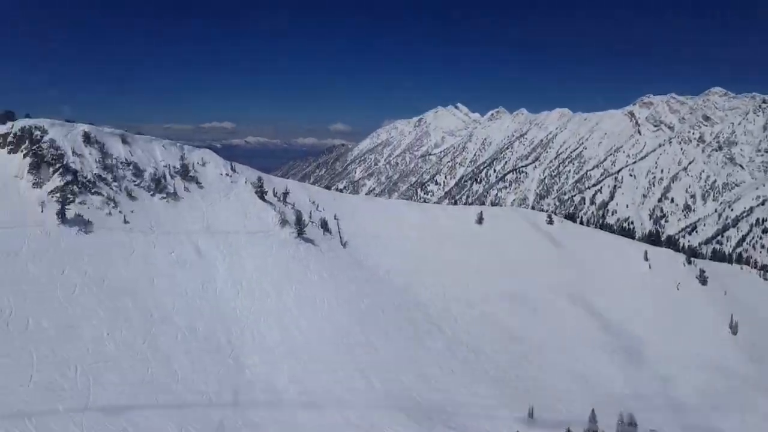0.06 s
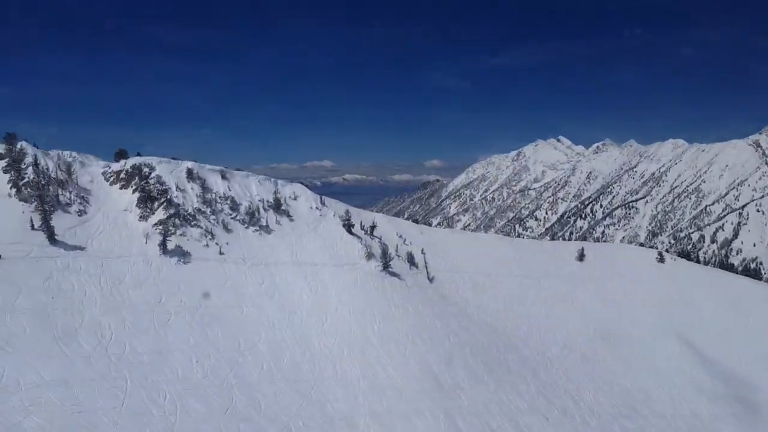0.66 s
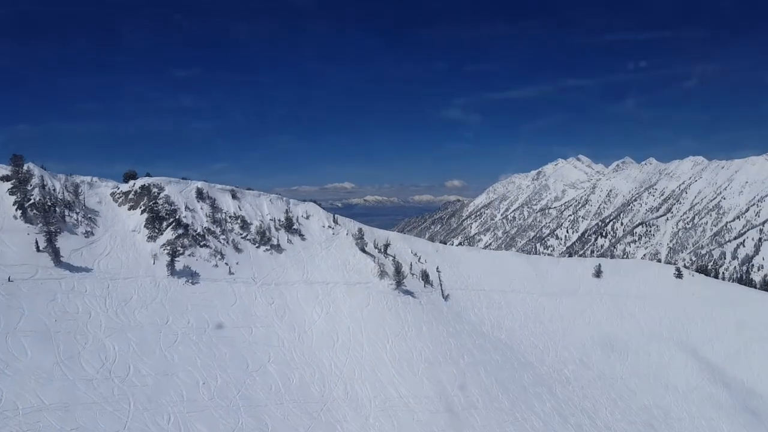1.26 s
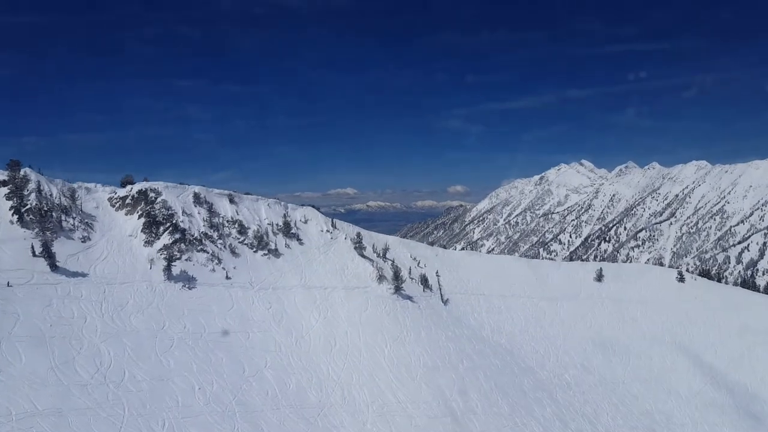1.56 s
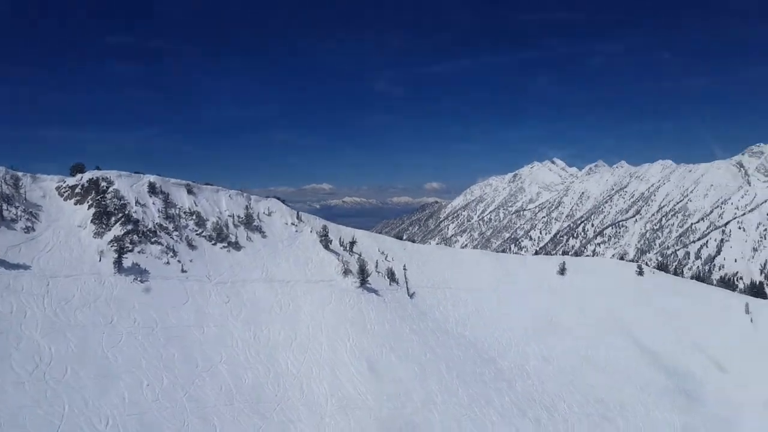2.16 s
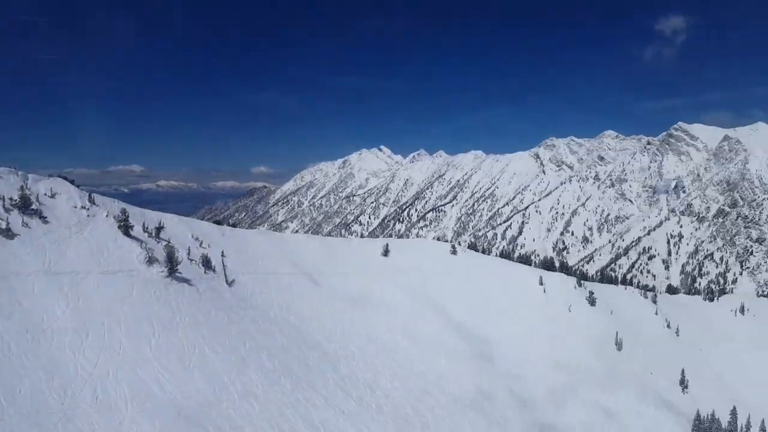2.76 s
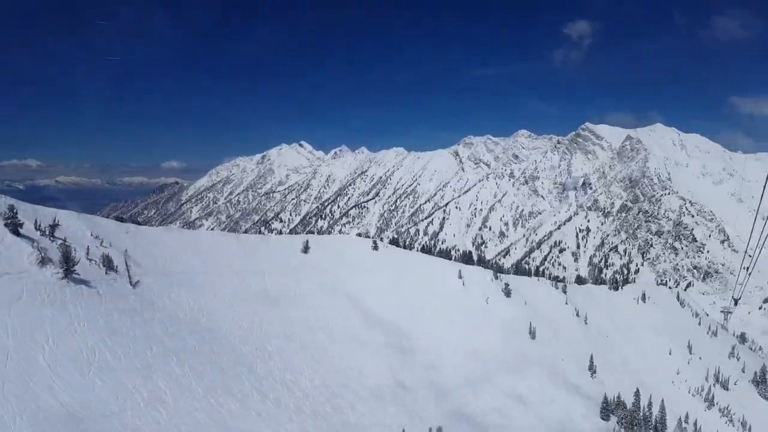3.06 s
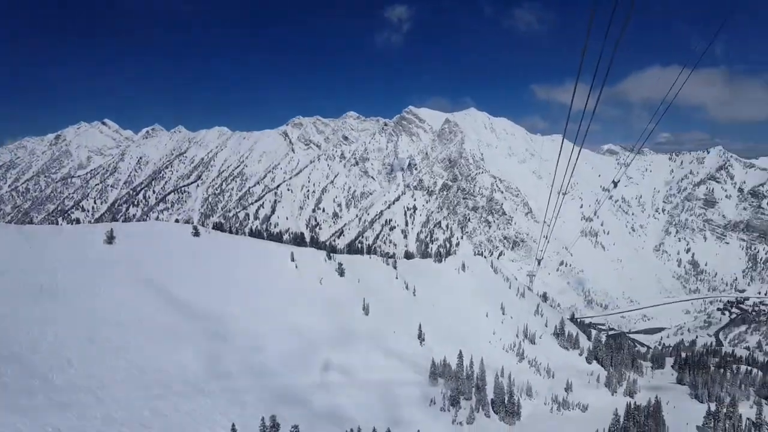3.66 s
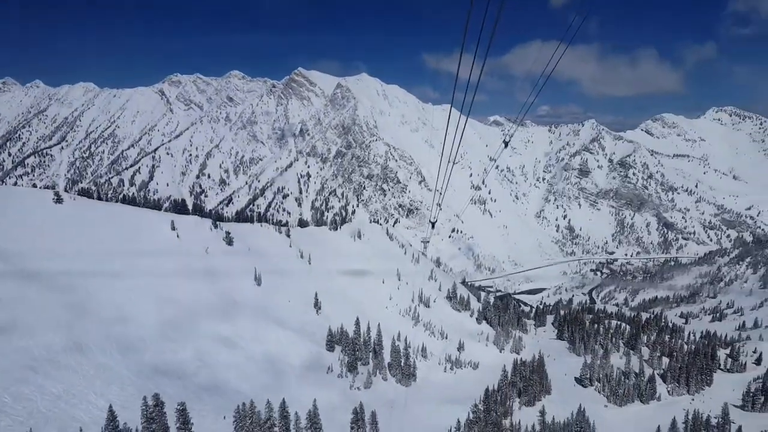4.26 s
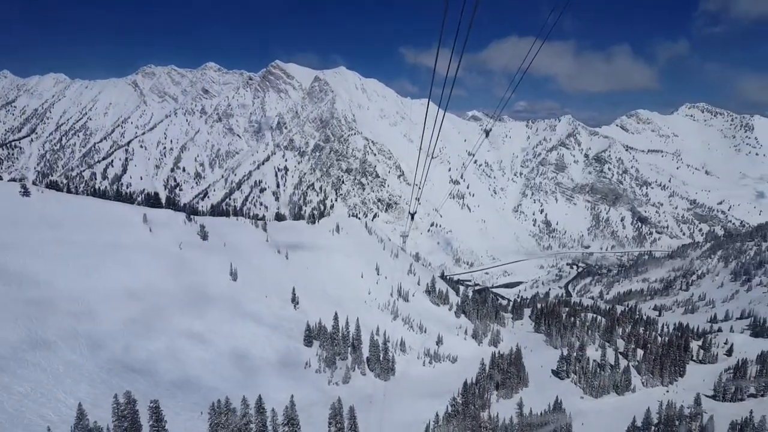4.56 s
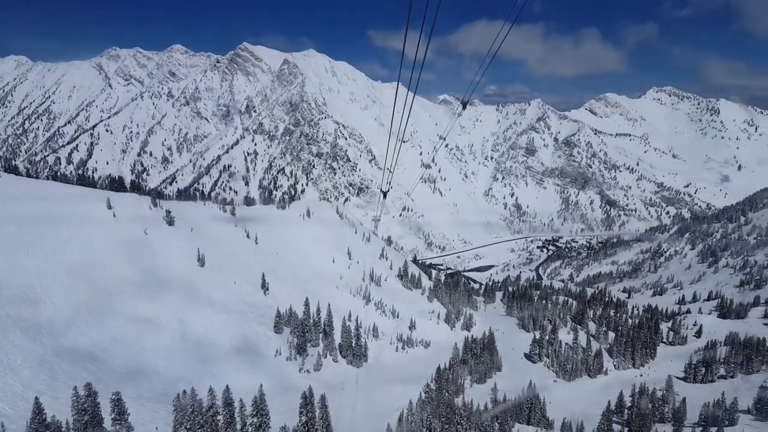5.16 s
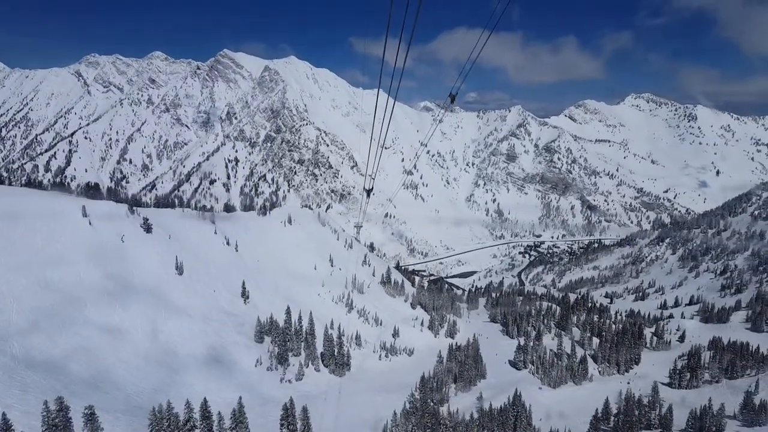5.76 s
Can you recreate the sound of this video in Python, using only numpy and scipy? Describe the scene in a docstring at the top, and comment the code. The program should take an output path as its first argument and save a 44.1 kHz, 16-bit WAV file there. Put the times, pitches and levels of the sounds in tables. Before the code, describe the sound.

Inside a cable car gliding along its cables, the wheels make a steady low rumble and a gently pulsing hum. A few soft shudders pass through the cabin, early on and again near the end. Close to the microphone, a nylon jacket rustles quietly, with faint ticks from creases and a zip pull, growing busier late on. A faint wash of air lies behind.

```python
"""Inside a gliding aerial tram

Carriage wheels rolling on the cable drone through the hanger and make the cabin rumble, with a soft
shudder at each rough spot. Close by, a nylon ski jacket rustles as its sleeve slides, creases tick and
a zip pull tinkles, all echoing briefly off the walls. Air rushes past the shell."""
import sys
import numpy as np
from scipy import signal
from scipy.fft import rfft, irfft, next_fast_len
from scipy.io import wavfile
from scipy.ndimage import uniform_filter1d

SR = 44100
rng = np.random.default_rng(int(sys.argv[2]) if len(sys.argv) > 2 else 0)


def digitize_waveform(pressure):
    """Quantize a signal to 16-bit integers and store it at the path in sys.argv[1].

    Rows of a 2-D input are taken as channels; values are limited to [-1, 1].
    """
    field = np.atleast_2d(pressure).T
    bounded = np.clip(field, -1, 1)
    quanta = np.round(bounded * 32767).astype(np.int16)
    wavfile.write(sys.argv[1], SR, quanta)


N = 260631
T = np.arange(N) / SR
MARGIN = 4096  # samples of padding at each end of a filtered signal
FREQS = np.fft.rfftfreq(2 * next_fast_len(N // 2 + MARGIN + 1), 1 / SR)
TOP_HZ = 15900


def undb(db):
    """Decibels to gain."""
    return 10 ** (np.asarray(db) / 20)


def unit(x):
    """Scale to rms 1."""
    return x / np.sqrt(np.mean(np.abs(x) ** 2))


def curves(table):
    """The columns of an automation table, sample by sample."""
    times, *columns = np.transpose(table)
    return [np.interp(T, times, column) for column in columns]


def response(points):
    """An EQ curve drawn through (freq_hz, level_db) points."""
    hz, db = np.transpose(points)
    return undb(np.interp(np.log(FREQS + 1), np.log(hz), db))


def lowpass(cutoff_hz, order):
    """An EQ curve that rolls off by 6 dB per octave for each order."""
    return 1 / (1 + (FREQS / cutoff_hz) ** order)


def resonance(centre_hz, half_width_hz):
    """An EQ curve with a single peak."""
    return 1 / (1 + ((FREQS - centre_hz) / half_width_hz) ** 2)


def shape(x, gain):
    """Filter x by an EQ curve; mirrored margins keep the ends smooth."""
    size = 2 * (len(FREQS) - 1)
    padded = np.pad(x, [(0, 0)] * (x.ndim - 1) + [(MARGIN, MARGIN)], mode="reflect")
    return irfft(rfft(padded, size) * gain, size)[..., MARGIN:MARGIN + N]


def walk(rate_hz):
    """Smooth random drift of rms 1 that turns about rate_hz times a second."""
    hold = int(SR / rate_hz)
    steps = np.repeat(rng.standard_normal(N // hold + 2), hold)
    return unit(uniform_filter1d(uniform_filter1d(steps, hold), hold)[:N])


def diffuse(spectrum, mic_gap_m=0.16):
    """Noise from all sides: alike left and right until the wavelength nears the microphone gap."""
    likeness = np.sinc(2 * FREQS * mic_gap_m / 343)  # sound travels at 343 m/s
    mid = shape(rng.standard_normal(N), response(spectrum) * np.sqrt(1 + likeness))
    side = shape(rng.standard_normal(N), response(spectrum) * np.sqrt(1 - likeness))
    return unit(np.array([mid + side, mid - side]))


def tone(hz, waver, rate_hz):
    """A sine of rms 1 whose strength and phase wander."""
    wander = unit(1 + waver * (walk(rate_hz) + 1j * walk(rate_hz)))
    return np.sqrt(2) * np.real(wander * np.exp(2j * np.pi * (hz * T + rng.random())))


def decay(start_s, t60_s):
    """An instant attack, then an exponential decay."""
    age = T - start_s
    return (age >= 0) * np.exp(-np.log(1000) * np.clip(age / t60_s, 0, 10))


def swell(peak_s, rise_s, fall_s, roundness=0.47):
    """Grows exponentially to a rounded top of 1 at peak_s, then dies away."""
    age = T - peak_s
    spans = age / np.where(age < 0, rise_s, fall_s)
    return np.exp(roundness - np.hypot(roundness, np.clip(spans, -20, 20)))


# The running gear's bed of low tones: pitch_hz, level_db, waver_ratio
DRONE_TONES = [(47.1, -33.5, 0.13), (54.66, -35.5, 0.6), (59, -34.5, 0.15), (100, -38.5, 0.2),
               (110.8, -37, 0.11), (162.7, -51.5, 0.4), (192.1, -49.5, 1), (258.5, -70.5, 0.2),
               (285.6, -67, 0.38)]
# Three strong, beating hums: pitch_hz, level_db, waver_ratio, beat_period_s, crest_s, beat_depth_ratio
BEATING_HUMS = [(73.83, -32, 0.21, 1.0, 1.02, 0.21), (117.3, -34, 0.36, .465, 0.08, 0.19),
                (203.8, -36.5, 0.14, 0.8197, 0.28, 0.43)]
# Level automation, how hard the carriage drives the cabin: time_s, hum_gain_db, shudder_gain_db
CARRIAGE_DRIVE = [(0, -3, 0), (.8, -4, -0.5), (1.05, -0.1, 3.5), (1.55, -2, -2), (1.9, 1.8, 3),
                  (2.4, -0.5, 1), (2.9, 1, 1.5), (3.3, -1, -1), (4.05, 1.5, 0), (4.9, 1.25, 3.5),
                  (5.9, -1, 2.5)]


def running_gear():
    """Wheels rolling on the track cable sing at a few low pitches that beat and swell."""
    drone = sum(undb(db) * tone(hz, waver, rate_hz=2.967) for hz, db, waver in DRONE_TONES)
    hums = np.zeros(N)
    for pitch_hz, level_db, waver, period_s, crest_s, depth in BEATING_HUMS:
        beat = np.abs(1 + depth * np.exp(2j * np.pi * (T - crest_s) / period_s))
        hums += undb(level_db) * beat * tone(pitch_hz, waver, rate_hz=6)
    hum_gain_db, _ = curves(CARRIAGE_DRIVE)
    return drone + undb(hum_gain_db) * hums


# The deep boom of the shell, as an EQ curve: freq_hz, gain_db
SHELL_SPECTRUM = [(10, -18), (30, -10.5), (42, -8), (62, -4.5), (82, 1.5), (94, -4), (125, 2), (145, -2),
                  (172, -5), (190, -4), (230, -10.5), (300, -33), (500, -59.5)]
# The low-mid shudder of the panels, as an EQ curve: freq_hz, gain_db
PANEL_SPECTRUM = [(120, -10.5), (230, 1.5), (278, 2), (310, -4), (425, -7), (480, -10), (560, -13.5),
                  (720, -19), (1200, -23), (3000, -47)]


def cabin(wheel_turn_hz=8.4, rumble_db=-29.5, shudder_db=-47.5):
    """The shell booms, throbbing with each wheel turn; rougher stretches shake its panels harder."""
    hum_gain_db, shudder_gain_db = curves(CARRIAGE_DRIVE)
    throb = 1 + 0.21 * np.cos(2 * np.pi * (wheel_turn_hz * T + 0.2 * walk(1.8)))
    rumble = diffuse(SHELL_SPECTRUM) * throb * undb(rumble_db + 0.86 * hum_gain_db)
    shudder = diffuse(PANEL_SPECTRUM) * undb(shudder_db + shudder_gain_db)
    return rumble + shudder


# Soft bumps as the wheels cross rough spots: peak_s, shudder_db, boom_db
ROUGH_SPOTS = [(1.081, -37.5, -27.5), (2.16, -36.5, -28.5), (4.5, -41, -36), (4.909, -37, -24.5),
               (5.52, -45.5, -34)]


def jolts():
    """A rough spot gives shell and panels a brief shake, softened by the hanger."""
    boom = diffuse(SHELL_SPECTRUM)
    shudder = shape(diffuse(PANEL_SPECTRUM), lowpass(630, order=6))
    out = np.zeros((2, N))
    for peak_s, shudder_db, boom_db in ROUGH_SPOTS:
        shake = undb(shudder_db) * shudder + undb(boom_db) * boom
        out += swell(peak_s, rise_s=0.025, fall_s=0.062) * shake
    return out


# Swishes of the sleeve over the jacket: peak_s, level_db, rise_s, fall_s, brightness_db
SLEEVE_STROKES = [(.03, -56, 0.11, 0.078, -2), (.275, -47.5, 0.082, 0.2, -2),
                  (1.13, -58.5, 0.088, 0.15, -7), (1.96, -57.5, 0.053, 0.55, -2.5),
                  (2.58, -58.5, 0.097, 0.088, -2), (3.01, -59, 0.043, .1, -5),
                  (3.72, -47.5, 0.094, .095, 0), (4.13, -52.5, 0.031, 0.12, -1.5),
                  (4.36, -57, 0.062, 0.16, -2.5), (4.64, -50, 0.1, 0.12, 2), (4.82, -48, .03, 0.21, -1),
                  (4.99, -48.5, .06, 0.066, 3.5), (5.38, -39.5, 0.034, 0.095, -1),
                  (5.72, -53, 0.13, 0.18, -3.5)]


def sleeve(rest_db=-64, fidget_db=-1.8):
    """Strength and brightness of the rubbing: strokes add to a slight fidget; the strongest leads."""
    power = undb(rest_db + fidget_db * walk(4.8)) ** 2
    weighted_brightness = np.zeros(N)
    for peak_s, level_db, rise_s, fall_s, brightness_db in SLEEVE_STROKES:
        stroke_power = (undb(level_db) * swell(peak_s, rise_s, fall_s)) ** 2
        power += stroke_power
        weighted_brightness += brightness_db * stroke_power
    return np.sqrt(power), weighted_brightness / power


# The rustle of nylon on nylon, as an EQ curve: freq_hz, gain_db
NYLON_SPECTRUM = [(300, -17), (800, 1), (1500, 5), (3000, 0.5), (5000, -4.5), (8000, 1.5), (12000, -4.5),
                  (16000, -12)]


def jacket():
    """Ribbed nylon slides in countless tiny slips; a bright stroke trades low rub for a crisp top."""
    strength, brightness_db = sleeve()
    friction = diffuse(NYLON_SPECTRUM)
    friction *= unit(undb(0.61 * walk(70) + 1.4 * walk(900)))  # the grain of the slips
    rub = shape(friction, lowpass(4000, order=6))
    crisp = shape(friction, 1 - lowpass(9000, order=8))
    swish = friction - rub - crisp
    rub *= undb(-2.5 - 1.32 * brightness_db)
    crisp *= undb(1.2 * brightness_db)
    return strength * (rub + undb(-3) * swish + crisp)


# Folds catching in the fabric: peak_s, level_db, centre_hz, half_width_hz, length_s
FOLD_SCUFFS = [(0.27, -56, 2930, 550, 0.11), (1.156, -49, 1940, 400, 0.018),
               (4.78, -48.5, 2360, 300, 0.015), (4.825, -52, 3240, 400, 0.016),
               (4.815, -52, 5800, 900, 0.011), (5.378, -40.5, 5960, 1200, 0.016),
               (5.388, -46, 3300, 600, 0.017)]


def scuffs():
    """A taut fold drags for a moment and rasps in a narrow band."""
    out = np.zeros((2, N))
    noise = rng.standard_normal((2, N))
    for peak_s, level_db, centre_hz, half_width_hz, length_s in FOLD_SCUFFS:
        rasp = unit(shape(noise, resonance(centre_hz, half_width_hz)))
        envelope = np.exp(-2 * ((T - peak_s) / length_s) ** 2)
        out += undb(level_db) * rasp * envelope
    return out


# Clicks of zip pulls and creases: start_s, level_db, t60_s, tilt_db_per_octave
JACKET_TICKS = [(.985, -47, .012, 3), (1.04, -44, 0.017, 9), (1.095, -42, 0.025, 5), (1.157, -45, 0.016, 2),
                (1.578, -42.5, 0.017, -10), (1.752, -48, 0.18, -27), (1.888, -47, 0.35, -1),
                (1.893, -42, .045, 19), (1.901, -46.5, 0.058, -3), (2.423, -41, .012, 9),
                (2.496, -48.5, .03, -4), (2.667, -43, .01, 3), (3.139, -43.5, .035, 5),
                (4.064, -48, 0.23, 7), (4.764, -45.5, 0.16, 3), (5.014, -56, .03, -2)]


def ticks():
    """Zip pulls and creases give short dry cracks, dull or bright, a little to the left."""
    out = np.zeros((2, N))
    octaves = np.log2(np.clip(FREQS, 1200, TOP_HZ) / 1200)  # the tilt starts at 1200 Hz
    low_cut = 1 - lowpass(900, order=2)
    noise = rng.standard_normal((2, N))
    for start_s, level_db, t60_s, tilt_db in JACKET_TICKS:
        crack = unit(shape(noise, low_cut * undb(tilt_db * octaves)))
        out += undb(level_db) * decay(start_s, t60_s) * crack
    return out * undb([[2.5], [-1.5]])


# Light knocks on a small metal zip pull: start_s, level_db
PULL_KNOCKS = [(4.408, -70), (4.765, -48), (5.014, -52), (5.152, -59), (5.466, -48), (5.712, -55)]


def zip_pull():
    """Each light knock sets the pull chattering in one thin metal resonance."""
    ring = unit(shape(rng.standard_normal((2, N)), resonance(centre_hz=12100, half_width_hz=300)))
    return ring * sum(undb(level_db) * decay(start_s, t60_s=0.09) for start_s, level_db in PULL_KNOCKS)


# The wash of air along the shell, as an EQ curve: freq_hz, gain_db
AIR_SPECTRUM = [(200, 5.5), (600, -2.5), (940, 3), (1150, -1), (1700, -0.5), (2400, -3.5), (3200, -15.5),
                (5000, -35.5), (8000, -10.5), (16000, -26)]


def airflow(level_db=-55.5):
    """Air rushes round the cabin; gusts lift its low rush and its hiss separately."""
    air = diffuse(AIR_SPECTRUM)
    rush = shape(air, lowpass(1300, order=4))
    hiss = air - rush
    gusty = rush * undb(1.1 * walk(13)) + hiss * undb(0.9 * walk(17))
    return undb(level_db) * gusty


def reflections(send):
    """Windows and walls a step away return a dense, short tail that combs the treble."""
    size = int(0.25 * SR)
    tail = rng.standard_normal((2, size)) * decay(start_s=0.0037, t60_s=0.037)[:size]
    tail /= np.sqrt(np.sum(tail ** 2, axis=1, keepdims=True))
    return signal.fftconvolve(send, tail, axes=1)[:, :N]


def scene():
    """The cabin mix: drone and rumble, the close jacket with its reflections, and air behind."""
    cloth = jacket() + scuffs()
    knocks = ticks() + zip_pull()
    echoes = reflections(undb(-10) * cloth + undb(-8) * knocks)
    return running_gear() + cabin() + jolts() + airflow() + cloth + knocks + echoes


# The colour of the left microphone port: freq_hz, gain_db
LEFT_PORT_EQ = [(200, 0), (400, 1.4), (1000, -1), (2000, -5.5), (3500, -2), (5000, -2), (6600, -9),
                (8000, -0.5), (9000, -9), (10000, -27), (12000, -10), (16000, -3.5)]
# The colour of the right microphone port: freq_hz, gain_db
RIGHT_PORT_EQ = [(200, 0.5), (400, 4), (1000, 1.3), (2000, 1), (3400, 4), (4500, 2.5), (6300, 10),
                 (7200, 8), (8100, -3.5), (9000, -13.5), (10000, -14), (12000, -9), (14000, -9.5)]


def record(dry, hiss_db=-73.5, draught_db=-53, edge_fade_s=0.006):
    """Each port of a hand-held phone has its own colour and draught; the phone adds hiss, cuts the top."""
    coloured = shape(dry, np.array([response(LEFT_PORT_EQ), response(RIGHT_PORT_EQ)]))
    hiss = undb(hiss_db) * rng.standard_normal((2, N))
    draught = undb(draught_db) * unit(shape(rng.standard_normal((2, N)), lowpass(110, order=2)))
    edge_fade = np.clip(np.minimum(T, T[-1] - T) / edge_fade_s, 0, 1)
    high_cut = signal.ellip(10, 0.2, 70, TOP_HZ, fs=SR, output="sos")
    return signal.sosfilt(high_cut, (coloured + hiss + draught) * edge_fade)


dry = scene()
out = record(dry)
digitize_waveform(out)
```